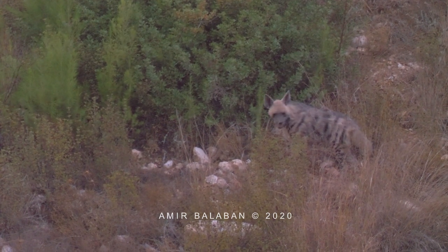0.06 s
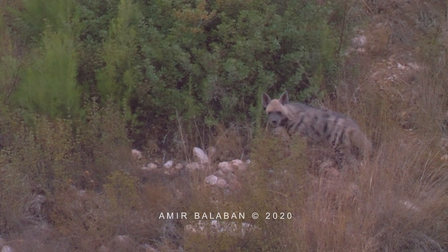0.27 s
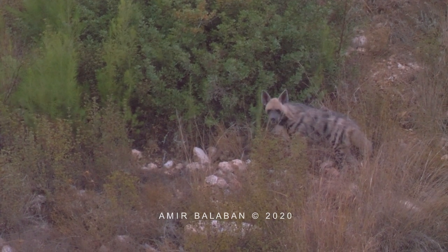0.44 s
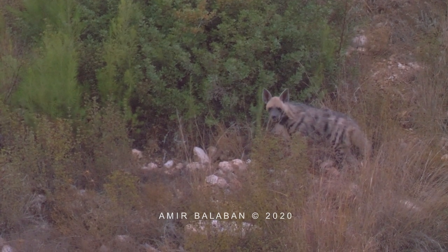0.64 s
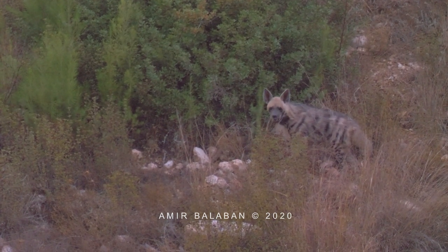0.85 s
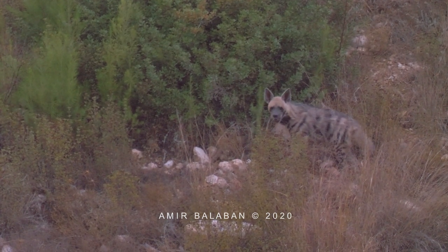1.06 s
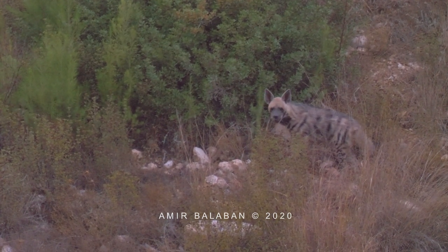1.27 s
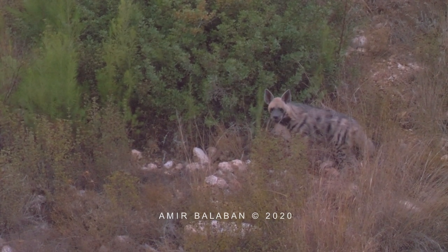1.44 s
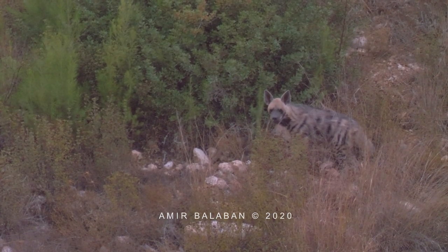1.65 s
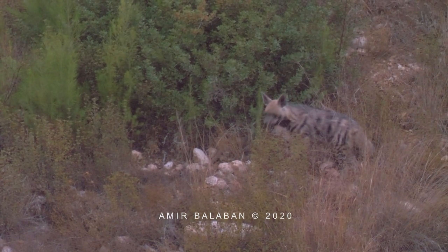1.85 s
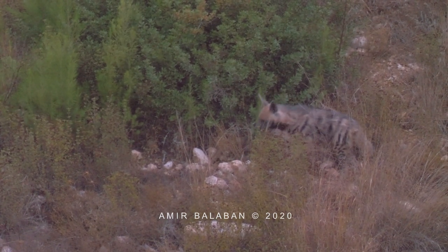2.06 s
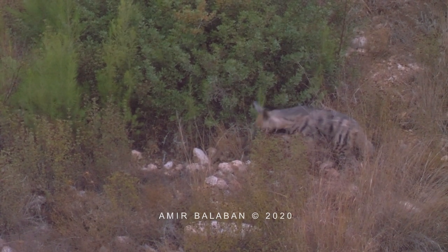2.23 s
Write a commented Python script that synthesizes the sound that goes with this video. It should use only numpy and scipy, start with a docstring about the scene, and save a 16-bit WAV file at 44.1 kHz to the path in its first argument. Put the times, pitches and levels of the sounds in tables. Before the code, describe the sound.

A hyena starts one long, low, growling moan right at the beginning. It rises in pitch and swells, loudest around 0.7 seconds, turns rough and raspy from about 1.1 seconds, then sinks and fades out by 2.2 seconds with a slight, dull outdoor echo. Faint crickets trill over a quiet hiss throughout, and a dry stalk gives one tiny tick near 1.9 seconds.

```python
"""Hyena on a hillside at dusk

One long growling moan, heard in the scrub on a pair of microphones. The pitch rises and sinks as the
vocal folds break between clean, period-doubled and raspy pulsing, ringing the throat and nose.
The slope returns a faint, dull tail. Behind it, tree crickets trill with their wings in the bushes
over a quiet hiss, and a dry stalk ticks once."""
import sys
import numpy as np
from scipy import signal
from scipy.fft import rfft, irfft
from scipy.io import wavfile
from scipy.ndimage import uniform_filter1d

SR = 44100
rng = np.random.default_rng(int(sys.argv[2]) if len(sys.argv) > 2 else 0)


def unload_wav(signal):
    """Save mono or channel-first audio to the path in sys.argv[1] as 16-bit WAV at rate SR, clipped to [-1, 1]."""
    wavfile.write(
        sys.argv[1],
        SR,
        np.round(np.clip(np.atleast_2d(signal).T, -1, 1) * 32767).astype(np.int16),
    )


N = 105840
T = np.arange(N) / SR
BINS = np.fft.rfftfreq(N, 1 / SR)

# Pitch of the vocal folds. Each row: time in seconds, pitch in Hz.
FOLD_PITCH = [(.05, 110), (.09, 139.5), (.16, 188.6), (.19, 202.8), (.23, 213), (.3, 212), (.41, 216.3),
              (.51, 225.1), (.6, 230.6), (.68, 233), (.75, 227.8), (.99, 211.2), (1.13, 204.5), (1.21, 204),
              (1.36, 188.9), (1.47, 176), (1.63, 161.5), (1.78, 141.5), (1.95, 133.3), (2.04, 127.1),
              (2.12, 120.2), (2.2, 109.2)]
# Strong and weak pulses alternating. Each row: time in seconds, half harmonics against whole in dB.
PERIOD_DOUBLING = [(.24, -19.5), (.29, -3.5), (.46, -1), (.5, -11.5), (.62, -8.5), (.66, 7.5), (.8, -4),
                   (.9, 1.5), (1.04, 1), (1.12, -8), (1.34, -14.5), (1.4, -4.5), (1.44, -4.5), (1.72, 3),
                   (1.8, -12), (1.89, -6.5), (1.95, -30)]
# Irregular vibration. Each row: time in seconds, rasp gain in the body in dB, rasp gain higher up in dB.
FOLD_RASP = [(.08, -10, -6), (.22, -28, -16), (.6, -30, -17), (.7, -22, -10), (.77, -24, -12),
             (.82, -11, -3), (.9, -21, -10), (1.02, -19, -9), (1.08, -4, 3), (1.14, -5, 3), (1.2, -13, 0),
             (1.3, -14, 0), (1.39, -7, 1), (1.46, -17, -7), (1.62, -18, -7), (1.7, -13, -3),
             (1.88, -17, -6), (1.98, -26, -16), (2.2, -18, -12)]
# The moving throat. Each row: time in seconds, first, second and third resonance in Hz, tuning factor
# for the side, upper, nasal and edge rings.
THROAT_SHAPE = [(.1, 361, 937, 1280, 1.08), (.35, 408, 955, 1360, 1.03), (.6, 456, 975, 1300, 1.03),
                (.69, 437, 939, 1327, 1.025), (.78, 381, 920, 1270, 1.025), (.97, 380.5, 910, 1178, 0.97),
                (1.2, 401, 927, 1346, 0.96), (1.38, 389, 927, 1230, 0.93), (1.47, 437.5, 947, 1256, 0.95),
                (1.7, 386, 931, 1253, 0.93), (1.87, 403, 925, 1230, 0.93), (2.15, 374, 914, 1220, 0.89)]
# Upper shoulder of the first resonance. Each row: time in seconds, gain in dB.
SHOULDER_GAIN = [(.2, -35), (.7, -9), (.95, -22), (1.2, -5), (1.38, -30.5), (1.45, -6), (1.7, -15.5),
                 (1.92, -6), (2.02, -10), (2.2, -2.5)]
# Swell and fade of each part of the voice. Each row: time in seconds, level going into the mix in dB.
CHEST_LEVEL = [(.04, -83), (.1, -60.5), (.17, -59.5), (.22, -52.5), (.42, -54), (0.519, -47), (.66, -46),
               (.8, -50.5), (1, -53), (1.12, -48.5), (1.4, -50), (1.52, -52), (1.6, -66), (1.7, -55),
               (1.82, -62), (1.95, -60), (2.1, -64.5), (2.23, -78)]  # clean fundamental
BODY_LEVEL = [(0.03, -76), (0.08, -47.5), (0.13, -40), (0.49, -23.5), (0.51, -26), (0.7, -22.5), (0.8, -26),
              (0.81, -24), (0.98, -27.5), (1.16, -24.5), (1.18, -21.5), (1.22, -28), (1.27, -22.5),
              (1.51, -31), (1.9, -36.5), (1.94, -36), (2.15, -48.5), (2.23, -66)]  # around the first resonance
SECOND_LEVEL = [(0.05, -71), (0.12, -51.5), (0.17, -46), (0.2, -55), (0.26, -48.5), (0.31, -36),
                (0.39, -34), (0.5, -46.5), (0.57, -42.5), (0.67, -29.5), (0.7, -35.5), (0.74, -30.5),
                (1.11, -35.5), (1.19, -37), (1.21, -31), (1.25, -35.5), (1.59, -39), (1.67, -46),
                (1.79, -40), (1.9, -50.5), (1.92, -59), (2.0, -47), (2.18, -58), (2.23, -83)]
THIRD_LEVEL = [(0.05, -84), (0.08, -64.5), (0.38, -38.5), (0.44, -43.5), (0.49, -38.5), (0.67, -33),
               (0.7, -40), (0.74, -32.5), (0.8, -29.5), (0.81, -36.5), (0.96, -30.5), (1.08, -38.5),
               (1.55, -41.5), (1.69, -53.5), (1.71, -42), (1.77, -48), (2.08, -53), (2.13, -68),
               (2.16, -55.5), (2.23, -79)]
NASAL_LEVEL = [(0.07, -76), (0.11, -59.5), (0.26, -55), (0.27, -50.5), (0.67, -36), (0.69, -42),
               (0.73, -35), (1.05, -38), (1.06, -43.5), (1.23, -43.5), (1.46, -46), (1.47, -42.5),
               (1.7, -54), (2.09, -66.5), (2.2, -75)]
EDGE_LEVEL = [(.1, -89), (.3, -62.5), (.45, -56), (.58, -50.5), (.66, -45), (.77, -41.5), (.9, -42),
              (1.03, -41.5), (1.17, -50), (1.21, -43), (1.26, -51), (1.45, -48), (1.62, -47), (1.75, -53),
              (1.95, -56), (2.1, -60.5), (2.2, -91)]
BREATH_LEVEL = [(.4, -89), (.75, -64.5), (.9, -60), (1, -55), (1.12, -60), (1.27, -66), (1.4, -64),
                (1.6, -65), (1.9, -80), (2.1, -95)]
# Rings of the nose, bright edge and breath. Each row: base frequency in Hz, width in Hz, gain in dB.
NASAL_MODES = [(1943, 58, 2.5), (2269, 108, -8)]
EDGE_MODES = [(2764, 65, 1.5), (3301, 235, -0.5), (3674, 134, 4.5)]
BREATH_MODES = [(4484, 410, -12), (6200, 500, -17.5), (7215, 360, -5), (8240, 220, -10.5),
                (10700, 680, -24)]
# The voice's balance at the microphones. Each row: frequency in Hz, left minus right in dB.
MIC_BALANCE = [(300, .2), (450, .3), (740, .3), (1000, -2.8), (1250, -3.2), (2000, -1.5), (3300, 2),
               (5000, 0)]
# Its phase at the microphones. Each row: frequency in Hz, lead of the left in radians.
MIC_PHASE = [(300, 0), (450, .03), (750, .3), (1000, .35), (1300, .3), (2070, .5), (2760, .4), (3620, -.3),
             (4200, 0)]
# Crickets in the bushes. Each row: wing tone in Hz, pulses per second, level of the direct tone in dB.
TREE_CRICKETS = [(3175, 82, -64), (3143, 30, -74), (3130, 39, -77), (3840, 35, -80.5)]
# Colour of the evening air. Each row: frequency in Hz, relative spectral level in dB.
HISS_COLOUR = [(25, -24), (70, -11.5), (130, -1), (250, 0.5), (420, 2.5), (700, -7.5), (1200, -5),
               (2000, -6), (4500, -8.5), (8000, -9.5), (12500, -13.5), (15500, -18)]
# Likeness of the hiss at the two microphones. Each row: frequency in Hz, correlation from 0 to 1.
HISS_LIKENESS = [(60, 0.99), (180, 1.0), (550, 0.95), (1650, 0.11), (4970, 0.36), (15000, 0.89)]


def amp(db):
    """Decibels to gain."""
    return 10 ** (np.asarray(db) / 20)


def unit(x):
    """Scales to rms 1."""
    return x / np.sqrt(np.mean(x ** 2) + 1e-20)


def curve(rows, column=1):
    """One column of a table over time, at every sample."""
    rows = np.array(rows)
    return np.interp(T, rows[:, 0], rows[:, column])


def spectrum(rows):
    """A table over frequency, at every bin."""
    hz, value = np.transpose(rows)
    return np.interp(np.log(BINS + 1), np.log(hz + 1), value)


def drift(rate_hz):
    """Random wander up to about rate_hz, rms 1."""
    return unit(irfft(rfft(rng.standard_normal(N)) / (1 + (BINS / rate_hz) ** 4), N))


def band(x, edges_hz, order=4):
    """Band-pass filter."""
    return signal.sosfilt(signal.butter(order, edges_hz, "band", fs=SR, output="sos"), x)


def notch(x, hz, q):
    """An antiresonance."""
    return signal.lfilter(*signal.iirnotch(hz, q, SR), x)


def resonate(x, hz, width_hz, order=1):
    """A resonance of gain 1 at a steady or moving frequency."""
    carrier = np.exp(2j * np.pi * np.cumsum(hz * np.ones(N)) / SR)
    pole = np.exp(-np.pi * width_hz / SR)
    baseband = x / carrier
    for _ in range(order):
        baseband = signal.lfilter([1 - pole], [1, -pole], baseband)
    return 2 * (carrier * baseband).real


def at_level(x, rows):
    """Makes a sound follow a level curve, silent outside it."""
    power = uniform_filter1d(uniform_filter1d(x ** 2, size=1500), size=1500)
    sounding = uniform_filter1d(1. * ((T > rows[0][0]) & (T < rows[-1][0])), size=600)
    return x / np.sqrt(abs(power) + 1e-12) * amp(curve(rows)) * sounding


def hyena(wander=.0034, jitter=.006, flutter_db=2.5, edge_rasp_db=6.5):
    """The moan: fold pulses, alternating or breaking into raspy puffs, ring the moving throat."""
    rasp_low, rasp_high = amp(curve(FOLD_RASP, 1)), amp(curve(FOLD_RASP, 2))
    chaos = rasp_high / np.sqrt(1 + rasp_high ** 2)  # 0 clean, 1 all rasp
    hz = curve(FOLD_PITCH) * (1 + wander * chaos * drift(25) + jitter * (1 + 2 * chaos) * drift(180))
    cycles = np.cumsum(hz) / SR
    pulses, puffs = fold_pulses(cycles), air_puffs(cycles, hz)
    flutter = amp(flutter_db * chaos ** 2 * drift(28))
    first_hz, second_hz, third_hz, tuning = (curve(THROAT_SHAPE, k) for k in range(1, 5))

    chest = at_level(np.cos(2 * np.pi * cycles), CHEST_LEVEL)
    body = throat_body(pulses + rasp_low * band(puffs, (230, 2000), order=2), first_hz, tuning)
    drive = pulses + rasp_high * puffs
    middle = throat_middle(drive, second_hz, third_hz, tuning, chaos)
    edge = bright_edge(pulses + amp(edge_rasp_db) * rasp_high * puffs, tuning)
    upper = middle + nasal_ring(drive, tuning) + edge + breath(puffs)
    return chest + body + flutter * notch(upper, hz=2477, q=5.5)  # antiresonance of the nose


def fold_pulses(cycles, smear=.01208, half_smear=.025, skew=.048):
    """Higher harmonics lag, so each pulse is a short slap; half harmonics make the pulses alternate."""
    whole = sum(np.cos(2 * np.pi * k * (cycles - smear * k)) for k in range(2, 34))
    # The alternation is more spread out and comes a little off the beat.
    halves = sum(np.cos(2 * np.pi * (k + .5) * (cycles - skew - half_smear * k)) for k in range(1, 26))
    doubling = amp(curve(PERIOD_DOUBLING))
    return (whole + doubling * halves) / np.sqrt(1 + doubling ** 2)


def air_puffs(cycles, hz, decay_cycles=.2):
    """Air noise that surges once in each cycle of the folds."""
    gate = unit(.65 + np.exp(-(cycles % 1) / decay_cycles))
    return gate * rng.standard_normal(N) * np.sqrt(SR / hz) / 2


def throat_body(drive, first_hz, tuning):
    """The throat's first resonance, with a shoulder and a small side ring above it."""
    first = resonate(drive, first_hz, width_hz=49.5)
    shoulder = amp(curve(SHOULDER_GAIN)) * resonate(drive, 554, width_hz=44)
    side_ring = amp(-15) * resonate(drive, 655 * tuning, width_hz=110, order=2)
    body = band(first - shoulder + side_ring, (38, 853), order=3)
    return at_level(notch(body, hz=251.2, q=7.5), BODY_LEVEL)


def throat_middle(drive, second_hz, third_hz, tuning, chaos):
    """The second and third resonances; a weak upper ring comes in with the rasp."""
    second = band(resonate(drive, second_hz, width_hz=31), (749, 1080))
    upper_ring = amp(-17) * resonate(drive, 1714 * tuning, width_hz=75)
    third = band(resonate(drive, third_hz, width_hz=145) - chaos * upper_ring, (1100, 1810))
    return at_level(second, SECOND_LEVEL) + at_level(third, THIRD_LEVEL)


def nasal_ring(drive, tuning):
    """Two resonances of the nose, opposite in sign."""
    rings = sum((-1) ** k * amp(db) * resonate(drive, hz * tuning, width)
                for k, (hz, width, db) in enumerate(NASAL_MODES))
    return at_level(band(rings, (1612, 2480), order=7), NASAL_LEVEL)


def bright_edge(drive, tuning):
    """Three high resonances give the voice its edge."""
    rings = sum(amp(db) * resonate(drive, hz * tuning, width, order=2) for hz, width, db in EDGE_MODES)
    return at_level(band(rings, (2670, 3753), order=7), EDGE_LEVEL)


def breath(puffs):
    """Air hissing through the mouth."""
    rings = sum(amp(db) * resonate(puffs, hz, width, order=2) for hz, width, db in BREATH_MODES)
    return at_level(rings, BREATH_LEVEL)


def hillside(voice, tail_db=-24, t60_s=.55, onset_s=.038):
    """The voice reaches each microphone a little differently; scrub and slope return a dull tail."""
    left = amp(spectrum(MIC_BALANCE) / 2) * np.exp(.5j * spectrum(MIC_PHASE))
    direct = irfft(rfft(voice) * np.array([left, 1 / left]), N)
    centre = band(rng.standard_normal(N), (250, 1800), order=1)  # keeps the tail mono in the bass
    wide = .52 * band(rng.standard_normal((2, N)), (614, 2990), order=2)
    echoes = (centre + wide) * amp(-60 * T / t60_s) * np.minimum(T / onset_s, 1)
    tail = signal.fftconvolve(voice[None], echoes / np.linalg.norm(echoes[0]), axes=1)[:, :N]
    return direct + amp(tail_db) * tail


def crickets(blur=.35, spread=.66):
    """Each cricket pulses one wing tone; narrow noise around it is the blur of the bushes."""
    chorus = np.zeros((2, N))
    for hz, rate, db in TREE_CRICKETS:
        strokes = np.cumsum(rate * (1 + .043 * drift(4.2))) / SR + rng.random()
        cycles = np.cumsum(hz * (1 + .00431 * drift(35))) / SR
        trill = unit(np.sin(np.pi * strokes) ** 2 * np.sin(2 * np.pi * cycles))
        centre, *sides = [unit(resonate(noise, hz, width_hz=110, order=2))
                          for noise in rng.standard_normal((3, N))]
        chorus += amp(db) * (trill + blur * centre + spread * np.array(sides))
    return chorus


def stalk(start_s=1.903, level_db=-54, decay_s=.003):
    """A dry stalk gives one tiny, high tick, dead centre."""
    snap = unit(resonate(rng.standard_normal(N), 12500, width_hz=2500))
    return amp(level_db) * snap * (T > start_s) * np.exp(-abs(T - start_s) / decay_s)


def evening_air(level_db=-58, waver_db=.14):
    """A quiet hiss, alike at both microphones in the bass and wide in the upper middle."""
    left, independent = rfft(rng.standard_normal((2, N)))
    likeness = np.clip(spectrum(HISS_LIKENESS), 0, 1)
    right = likeness * left + np.sqrt(1 - likeness ** 2) * independent
    hiss = unit(irfft(np.array([left, right]) * amp(spectrum(HISS_COLOUR)), N))
    return amp(level_db + waver_db * drift(24)) * hiss


def scene():
    """The call on the hillside, over the evening background."""
    return hillside(hyena()) + crickets() + evening_air() + stalk()


def record(dry, cutoff_hz=15720):
    """The recorder's band limit."""
    lowpass = signal.firwin(511, cutoff_hz, window=("kaiser", 9), fs=SR)
    return signal.oaconvolve(dry, lowpass[None], "same")


dry = scene()
out = record(dry)
unload_wav(out)
```